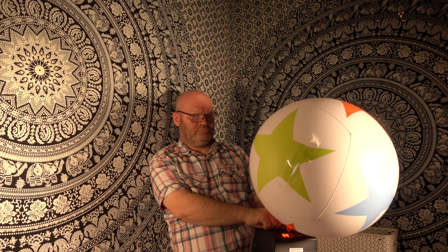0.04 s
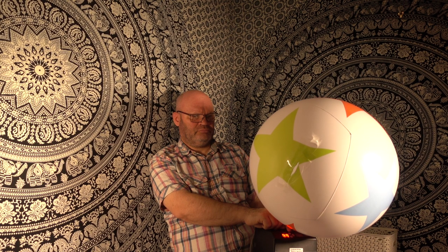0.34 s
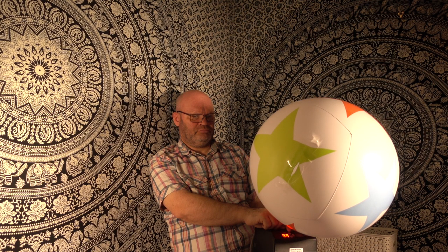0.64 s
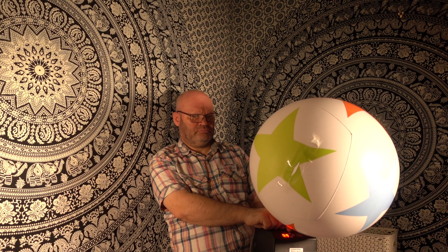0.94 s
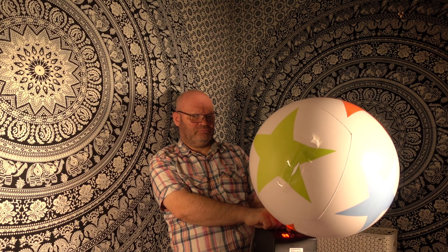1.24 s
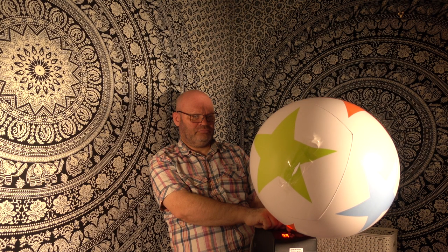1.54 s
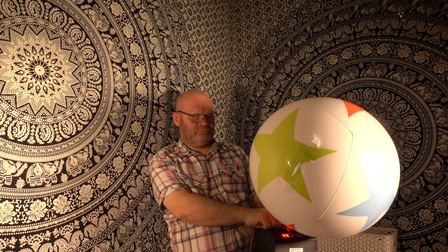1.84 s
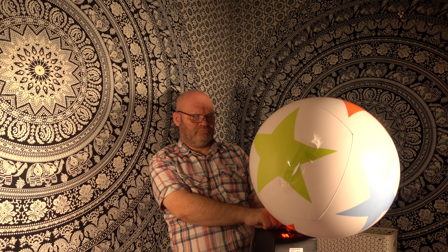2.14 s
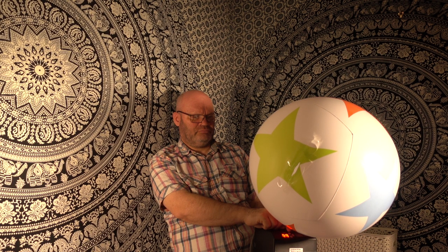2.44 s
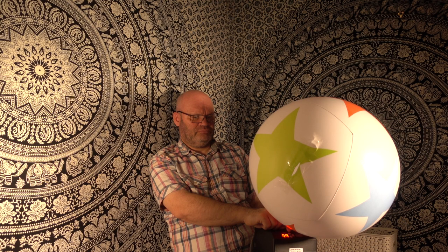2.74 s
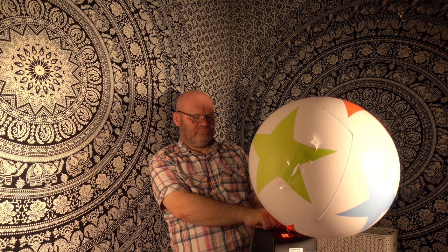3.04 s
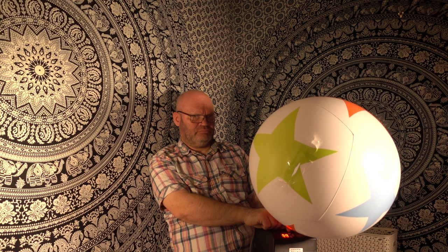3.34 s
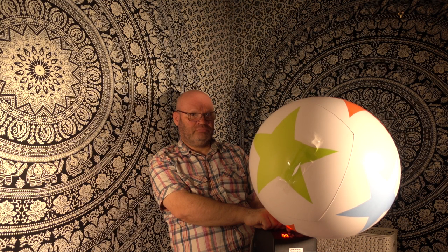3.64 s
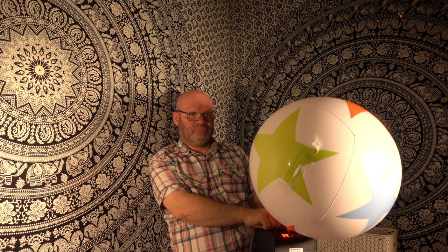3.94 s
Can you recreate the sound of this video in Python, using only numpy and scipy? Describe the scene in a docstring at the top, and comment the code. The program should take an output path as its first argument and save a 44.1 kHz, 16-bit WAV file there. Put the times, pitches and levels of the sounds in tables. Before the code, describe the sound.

An electric air pump inflates a large balloon, its even, rattling drone mixed with rushing air, heard from across a room. At the end the motor quickly winds down with a brief chatter of valves.

```python
"""A buzzing drone with a rattle and a hiss of air: a small electric piston pump fills a big balloon in a
room, a few metres from a stereo microphone. Piston and valves knock on every turn, the drive rattles in
a pattern of seven turns, and air rushes through the nozzle. Switched off near the end, the motor runs
down within a few turns, the pump shudders on its feet, the valves chatter and the room rings out."""
import sys
import numpy as np
from scipy import signal
from scipy.fft import rfft, irfft
from scipy.io import wavfile

SR = 44100
rng = np.random.default_rng(int(sys.argv[2]) if len(sys.argv) > 2 else 0)


def inscribe(sig):
    """Save sig as 16-bit PCM at rate SR to the path in sys.argv[1].

    A 1-D sig is mono; a 2-D sig holds one channel per row.
    Samples are clipped to [-1, 1] before scaling.
    """
    pcm = np.round(np.clip(np.atleast_2d(sig).T, -1, 1) * 32767)
    wavfile.write(sys.argv[1], SR, pcm.astype(np.int16))


N = 176400
LEAD = SR // 2  # samples for which the pump has already been running
TIME = np.arange(-LEAD, N) / SR
OFF_S = 3.726  # the current is cut
SIDE = np.array([[1], [-1]])  # adds on the left, subtracts on the right

# motor speed under power (time [s], speed [turns/s])
MOTOR_SPEED = [(0, 66.39), (1.2, 66.35), (1.8, 66.3), (3.7, 66.36)]
# knocks of piston and valves (place [share of a turn], weight [dB], centre [Hz], spread [octaves])
PISTON_KNOCKS = [(.64, 3, 1070, 0.28), (.58, -5, 1100, .3), (.265, -4, 810, 0.38), (0.1184, -9, 900, 0.42),
                 (0.019, -11, 1160, .3)]


def undb(db):
    """Decibels to gain."""
    return np.exp(np.asarray(db) * (np.log(10) / 20))


def curve(at, rows):
    """Straight lines through (x, value) rows."""
    return np.interp(at, *np.array(rows, float).T)


def over_hz(hz, rows):
    """Straight lines through (frequency, value) rows on a log axis."""
    row_hz, values = np.array(rows, float).T
    return np.interp(np.log(hz + 1e-3), np.log(row_hz), values)


def wander(rate_hz):
    """Slow drift with a spread near 1: random levels joined by straight lines."""
    step = int(SR / rate_hz)
    levels = 1.2 * rng.standard_normal((len(TIME) // step + 2, 1))
    return (levels[:-1] + np.diff(levels, axis=0) * np.arange(step) / step).ravel()[:len(TIME)]


def band_noise(low_hz, high_hz):
    """Two unrelated noises in a band, rms 1."""
    sos = signal.butter(2, [low_hz, high_hz], "band", fs=SR, output="sos")
    noise = signal.sosfilt(sos, rng.standard_normal((2, len(TIME))))
    return noise / noise.std()


def partial(turns, multiple, phase, response):
    """A tone that crosses the room to reach the microphone at this phase and, outside deep nulls, rms 1."""
    hz = multiple * np.mean(np.array(MOTOR_SPEED)[:, 1])
    delay = np.arange(response.shape[1]) / SR
    path = np.sum(response * np.exp(-2j * np.pi * hz * delay), axis=1)
    start_phase = (phase - np.angle(path))[:, None]
    gain = np.sqrt(2) / np.maximum(abs(path), .5)[:, None]
    return gain * np.cos(2 * np.pi * multiple * turns + start_phase)


def piston_drone(t, turns, response):
    """Harmonics of the turn rate line up into the knocks of the piston; the high ones waver most."""
    # drone at the microphone (multiple [of the turn rate], base level [dB], left minus right [dB])
    harmonics = [(1, -49, 0), (2, -36, 0), (3, -43, -1), (4, -41, 0), (5, -42, 0), (6, -50, -4),
                 (7, -38, 0), (8, -44, 2), (9, -42, 5), (10, -42, 3), (11, -31, 1), (12, -38, 4),
                 (13, -30, 1), (14, -42, 9), (15, -38, 5), (16, -30, -1), (17, -39, -2), (18, -34, 5),
                 (19, -31, -2), (20, -42, -2), (21, -44, -6), (22, -48, 2), (23, -48, 1), (24, -47, 6),
                 (25, -42, 2), (26, -51, 5), (27, -47, -2), (28, -50, -1), (29, -52, -2), (30, -48, 1),
                 (31, -48, -2), (32, -40, 1), (33, -48, -4), (34, -40, 13), (35, -48, 3), (36, -50, 1),
                 (37, -53, 0), (38, -53, 0), (39, -52, 2), (40, -54, 6), (41, -60, 2), (42, -55, 1),
                 (43, -54, -1), (44, -46, 2), (45, -48, -8), (46, -52, 5), (47, -50, -3), (48, -59, 1),
                 (49, -58, 4), (50, -55, 12), (51, -49, -8), (52, -55, 5), (53, -57, -4)]
    # the tone colour shifts as the balloon fills (time [s], shift [share])
    colour_shift = [(0, .2), (.5, -.4), (1.2, -.2), (1.8, -.9), (2.3, -.5), (2.7, .55), (3.1, .9),
                    (3.7, .7)]
    # harmonics that move with it (multiple [of the turn rate], change at a shift of 1 [dB])
    shifted_harmonics = [(12, 3), (13, 1.2), (14, 3.5), (15, -4), (16, -1.2), (18, 3.5), (20, 6), (24, -4),
                         (31, -5), (32, 1.5), (34, 4.5), (44, 2.5), (45, -1.5)]
    shift, shift_db = curve(t, colour_shift), dict(shifted_harmonics)
    place, knock_db, centre_hz, spread = np.array(PISTON_KNOCKS).T
    hum_fall_db = 380 * np.maximum(t - OFF_S, 0)  # without current the lowest harmonics die first
    out = np.zeros((2, len(t)))
    for order, db, pan_db in harmonics:
        hz = order * MOTOR_SPEED[0][1]
        weights = undb(knock_db) * np.exp(-.5 * (np.log2(hz / centre_hz) / spread) ** 2)
        knocks = np.sum(weights * np.exp(-2j * np.pi * order * place))
        housing_ring = 0.16 * complex(*rng.standard_normal(2))
        channel_gap_rad = 0.63 * min(hz / 1770, 1) * rng.choice([-1, 1])
        phase = np.angle(housing_ring - knocks) + channel_gap_rad * np.array([.5, -.5])
        waver_db = 1.2 * min(hz / 1800, 1) ** 2 * wander(rate_hz=3.96)
        gain = undb(db + shift_db.get(order, 0) * shift + waver_db - hum_fall_db / order)
        pan = undb(SIDE * pan_db / 2)
        pan /= np.sqrt(np.mean(pan ** 2))
        out += gain * pan * partial(turns, order, phase, response)
    return out


def drive_rattle(turns, response, pattern_turns=7):
    """The drive's longer pattern puts weak low partials among the harmonics."""
    # rattle at the microphone (multiple [of the pattern's rate], level [dB])
    partials = [(24, -60), (25, -58), (31, -62), (32, -66), (36, -61), (38, -48), (41, -59), (42, -54.5),
                (43, -64), (45, -51), (46, -75), (48, -56.5), (52, -60.5), (57, -64), (59, -61.5),
                (66, -66), (71, -62)]
    return sum(undb(db) * partial(turns, multiple / pattern_turns, 2 * np.pi * rng.random(), response)
               for multiple, db in partials)


def near_echoes(hz, count=12, span_s=.007):
    """Echoes off case, table and balloon ripple the treble, differently in each channel."""
    delays = span_s * rng.random((count, 2, 1))
    gain = .11 * hz / (hz + 1000)
    ripple = sum(np.exp(-2j * np.pi * hz * delay) for delay in delays)
    return (1 + gain * ripple) / np.sqrt(1 + count * gain ** 2)


def nozzle_air(t, turns, stop_s=3.749, fall_db_per_s=162):
    """Turbulence in the nozzle, pulsing a little with each stroke and dying as the flow stops."""
    # spectrum of the rushing air (frequency [Hz], base density [dB per Hz])
    air_spectrum = [(20, -94), (60, -87), (150, -84), (300, -79), (450, -73), (700, -73.5), (1150, -70),
                    (1500, -72.5), (1850, -74), (2200, -72.5), (3100, -70), (3600, -75), (4500, -73),
                    (6500, -75), (8500, -72.5), (10500, -75.5), (13500, -76), (15700, -81)]
    # likeness of left and right (frequency [Hz], correlation [0 to 1])
    air_likeness = [(120, 1), (1000, 0.73), (2200, 0.86), (4000, 0.29), (14000, 0.17)]
    # nozzle resonances (centre [Hz], width [Hz], left boost [dB], right boost [dB])
    resonances = [(3760, 53, 8, 11), (4255, 68, 2, 5.5), (7500, 104, 9, 4.5)]
    hz = np.fft.rfftfreq(len(t), 1 / SR)
    mid, side = rfft(rng.standard_normal((2, len(t))))
    likeness = over_hz(hz, air_likeness)
    noise = np.sqrt((1 + likeness) / 2) * mid + np.sqrt((1 - likeness) / 2) * side * SIDE
    boost_db = sum(np.array([[left], [right]]) / (1 + (2 * (hz - centre) / width) ** 2)
                   for centre, width, left, right in resonances)
    colour = undb(over_hz(hz, air_spectrum) + boost_db) * near_echoes(hz)
    hiss = irfft(noise * colour, len(t)) * np.sqrt(SR / 2)
    flow = undb(-0.5 - fall_db_per_s * np.maximum(t - stop_s, 0))
    pulsing = 1 + .07 * np.cos(2 * np.pi * (turns - PISTON_KNOCKS[1][0]))
    return hiss * flow * pulsing


def room_tail(gap_s=.005, low_cut_hz=170):
    """The room's diffuse ring, of unit energy: narrow in the bass, wide in the treble, which dies first."""
    # reverberation of the room (frequency [Hz], time to fall 60 dB [s])
    room_t60 = [(100, 0.58), (400, 0.37), (1200, 0.47), (4000, 0.28), (12000, 0.18)]
    t = np.arange(SR // 2) / SR
    hz = np.fft.rfftfreq(len(t), 1 / SR)
    mid, side = rfft(rng.standard_normal((2, len(t))))
    width = hz / (hz + 900)
    spectrum = (mid + width * side * SIDE) / np.sqrt(1 + width ** 2)
    spectrum *= hz / np.hypot(hz, low_cut_hz)
    octave = np.log2(np.clip(hz, 64, 2 ** 14))
    tail = 0
    for centre in range(6, 15):
        band = irfft(spectrum * np.maximum(1 - abs(octave - centre), 0))
        tail += band * undb(-60 * t / over_hz(2. ** centre, room_t60)) * (t > gap_s)
    return tail / np.sqrt(np.mean(np.sum(tail ** 2, axis=1)))


def path_to_microphone(tail, tail_db):
    """The direct sound followed by the room's tail."""
    return (np.arange(tail.shape[1]) == 0) + undb(tail_db) * tail


def room_tone(level_db=-65, knee_hz=400):
    """Faint dull noise of the room itself."""
    hz = np.fft.rfftfreq(N, 1 / SR)
    colour = hz / (hz + knee_hz / 2) / np.sqrt(1 + hz / knee_hz)
    noise = irfft(rfft(rng.standard_normal((2, N))) * colour, N)
    return undb(level_db) * noise / noise.std()


def pump_shudder(t, rise_s=0.0088):
    """The stalling pump rocks on its feet and its case rings."""
    # modes of feet and case (onset [s], level [dB], frequency [Hz], time to fall 60 dB [s])
    modes = [(3.774, -33.5, 86, 0.38), (3.725, -24, 360, 0.17), (3.785, -30, 377, 0.36),
             (3.79, -41, 221, .4)]
    out = 0
    for onset, db, hz, t60 in modes:
        age = np.maximum(t - onset, 0)
        envelope = (1 - np.exp(-age / rise_s)) * undb(db - 60 * age / t60)
        out += envelope * np.sin(2 * np.pi * hz * age)
    return out


def valve_chatter(t, coasting_s, fall_db_per_s=115, rise_s=0.012, clack_decay_s=.011):
    """The valves flap loosely and the piston clacks through its last strokes."""
    # last clacks of the piston (time [s], level [dB])
    strokes = [(3.752, -26), (3.791, -26.5), (3.828, -30), (3.86, -37), (3.883, -40.5)]
    flap_envelope = undb(-30.5 - fall_db_per_s * coasting_s) * (1 - np.exp(-coasting_s / rise_s))
    flapping = flap_envelope * band_noise(low_hz=140, high_hz=1500)
    clack_envelope = sum(undb(db) * (t > at) * np.exp(-abs(t - at) / clack_decay_s) for at, db in strokes)
    mid, side = flapping + clack_envelope * band_noise(low_hz=340, high_hz=1230)
    return mid + 0.17 * side * SIDE


def scene(run_down_s=.25, motor_fall_db_per_s=92, housing_cut_hz=47.7):
    """The motor's turns pace drone, rattle and air, heard across the room until the pump stops."""
    t, tail = TIME, room_tail()
    motor_path = path_to_microphone(tail, tail_db=-12)
    noise_path = path_to_microphone(tail, tail_db=-6)
    coasting_s = np.maximum(t - OFF_S, 0)
    speed_share = np.maximum(1 - coasting_s / run_down_s, 0)
    wobble = 1 + 0.000997 * wander(rate_hz=14)
    turns = np.cumsum(curve(t, MOTOR_SPEED) * wobble * speed_share) / SR
    turns -= turns[LEAD]
    motor = piston_drone(t, turns, motor_path) + drive_rattle(turns, motor_path)
    motor *= undb(-motor_fall_db_per_s * coasting_s) * speed_share
    # the small housing radiates no deep bass
    motor = signal.sosfilt(signal.butter(4, housing_cut_hz, "high", fs=SR, output="sos"), motor)
    noises = nozzle_air(t, turns) + valve_chatter(t, coasting_s)
    heard = signal.fftconvolve(motor, motor_path, axes=1) + signal.fftconvolve(noises, noise_path, axes=1)
    return heard[:, LEAD:LEAD + N] + pump_shudder(t[LEAD:]) + room_tone()


def record(dry):
    """The recorder cuts the treble steeply above 15750 Hz."""
    return signal.sosfilt(signal.ellip(10, .2, 80, 15750, fs=SR, output="sos"), dry)


dry = scene()
out = record(dry)
inscribe(out)
```